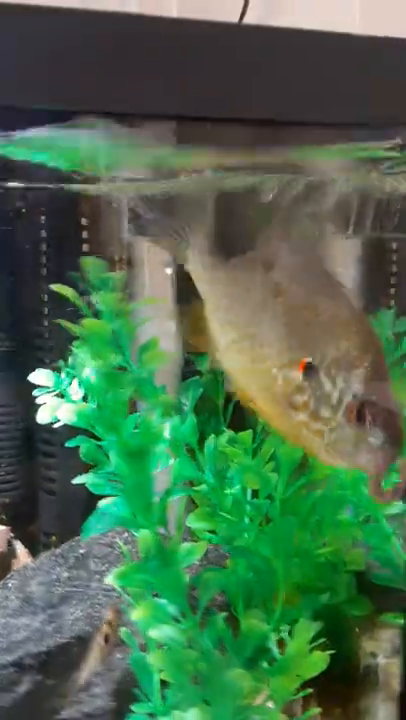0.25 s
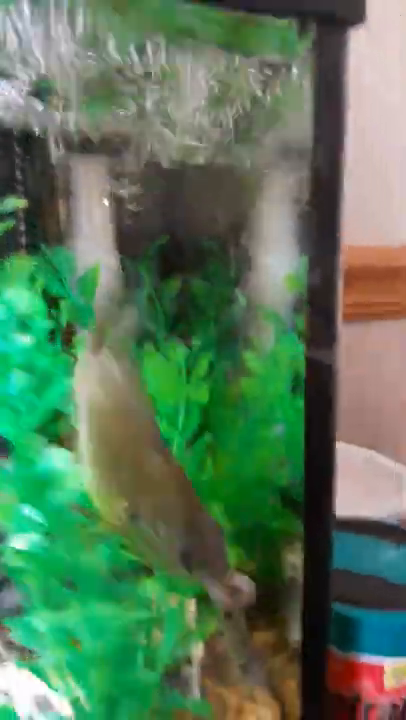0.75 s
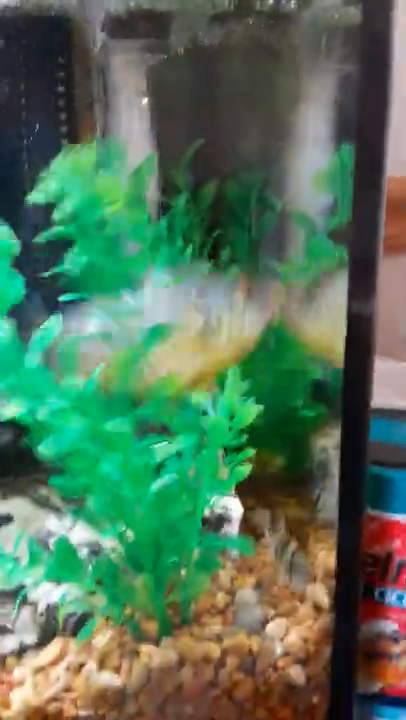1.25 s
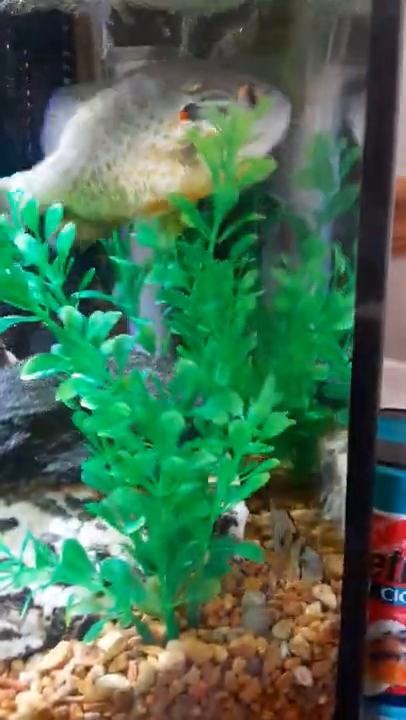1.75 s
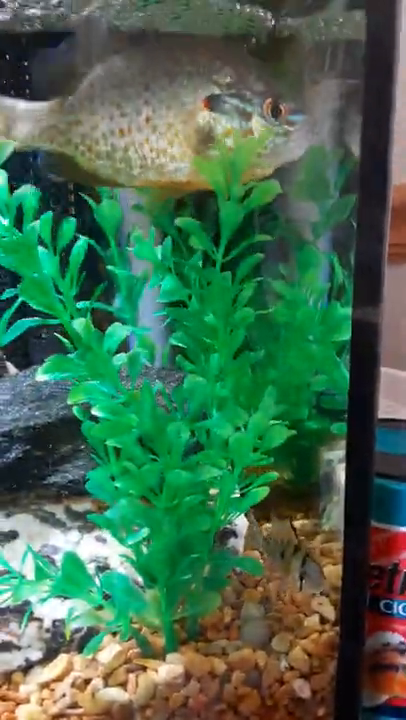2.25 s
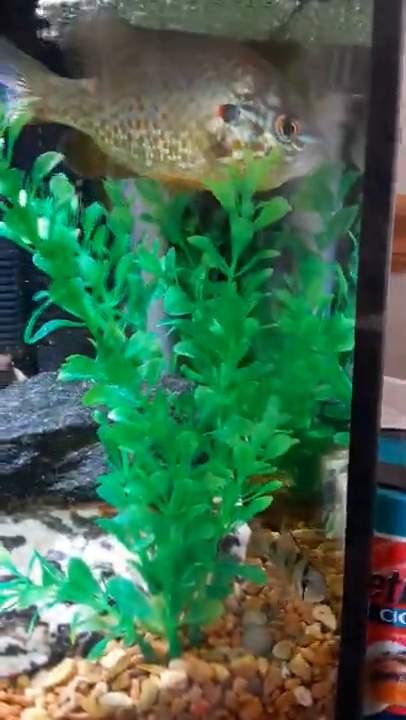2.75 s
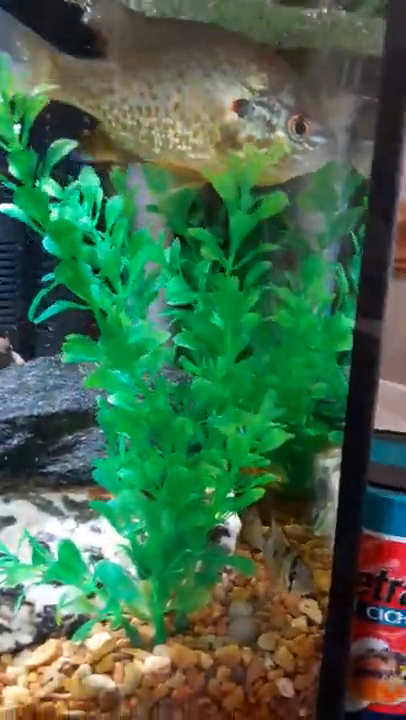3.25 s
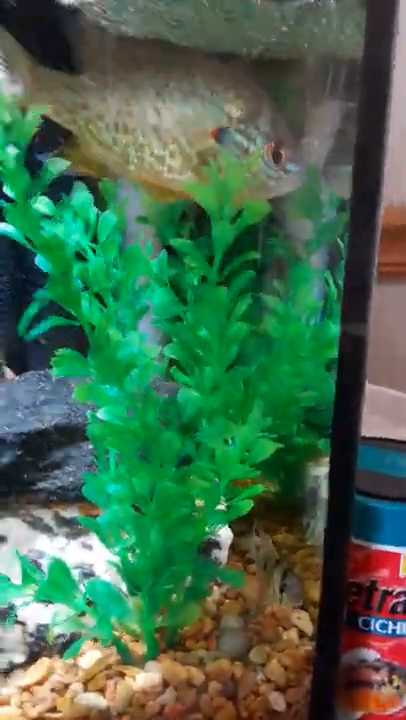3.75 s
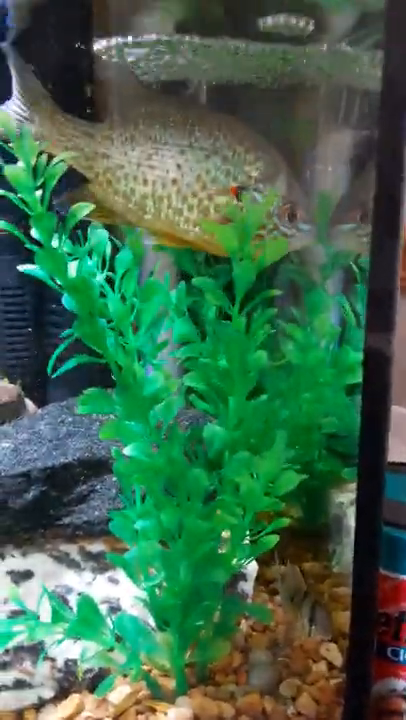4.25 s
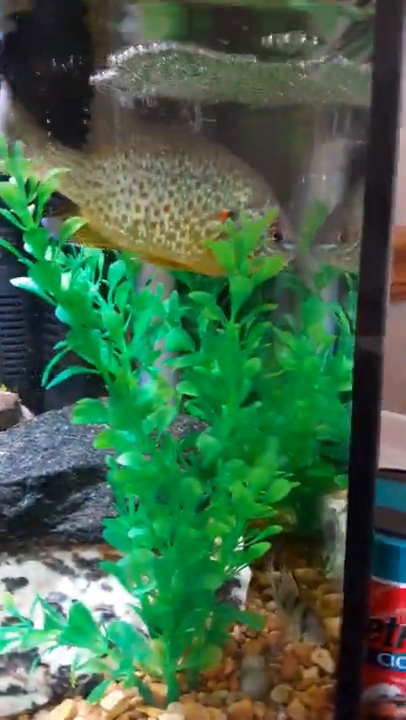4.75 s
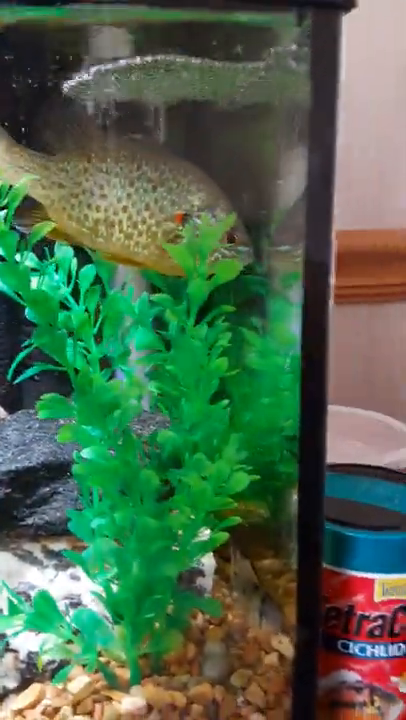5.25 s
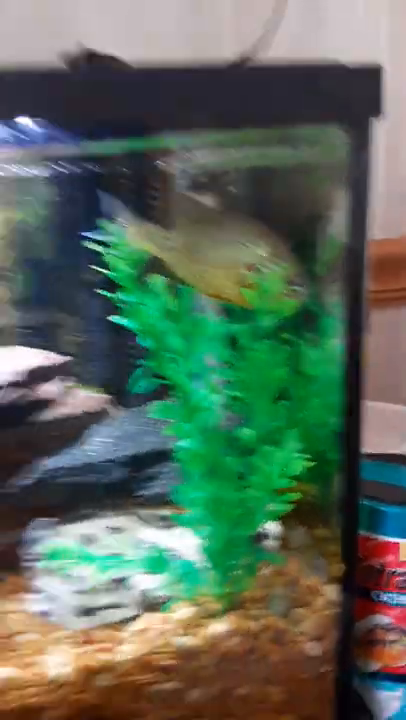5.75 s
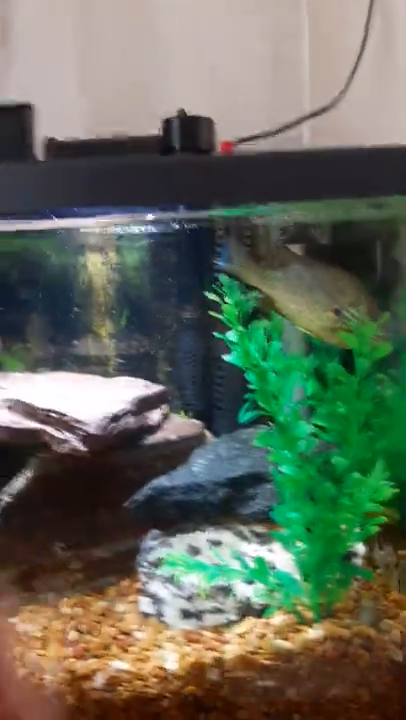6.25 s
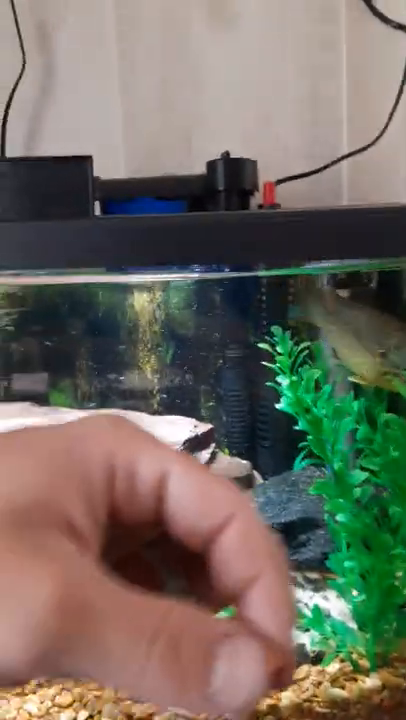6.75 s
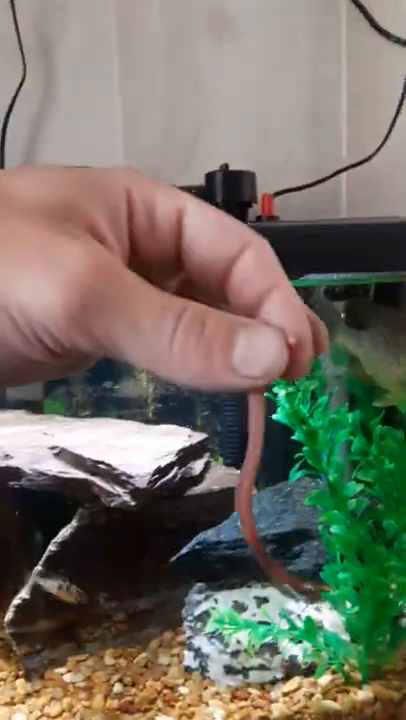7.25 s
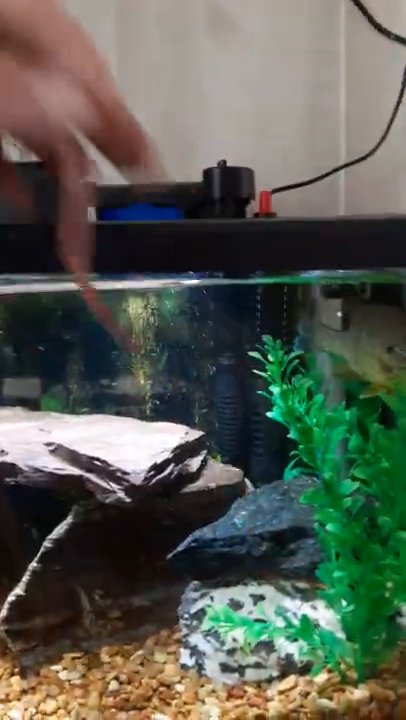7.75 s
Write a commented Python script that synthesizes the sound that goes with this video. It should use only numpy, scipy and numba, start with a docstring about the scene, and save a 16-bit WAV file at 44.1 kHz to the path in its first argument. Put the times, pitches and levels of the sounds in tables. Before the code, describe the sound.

A small aquarium filter trickles, drips and gurgles into its tank over a low pump hum, with a light knock at the end.

```python
"""A gulp and a patter of splashes: a small aquarium filter spills into its tank over the pump's mains hum.
Big low bubbles boom through the glass; drops and clouds of small bubbles ring under the hood.
Air pockets plop and a fish flicks its tail. The room is quiet, heard from a hand-held phone that moves
from the tank's corner to its front. Fingers rustle and tick by the right microphone,
and at the end a hand knocks the lid."""
import sys
import numpy as np
from scipy import signal
from scipy.fft import rfft, irfft
from scipy.io import wavfile
from scipy.ndimage import uniform_filter1d
from numba import njit

SR = 44100
rng = np.random.default_rng(int(sys.argv[2]) if len(sys.argv) > 2 else 0)


def output_pcm(signal):
    """Save a mono or channel-first signal as 16-bit PCM at the path in sys.argv[1].

    Samples are clipped to [-1, 1] before scaling.
    """
    pcm = np.clip(np.atleast_2d(signal).T, -1, 1) * 32767
    wavfile.write(sys.argv[1], SR, np.round(pcm).astype(np.int16))


N = 352800
T = np.arange(N) / SR
FREQS = np.arange(N // 2 + 1) * SR / N + 1e-6

# EQ curves for room tone, finger rustle, tail flicks and the low gurgle: f/Hz, gain/dB
ROOM_TONE_EQ = [(20, -17), (45, -6), (90, -2.5), (200, 0), (400, -6), (700, -10.5), (1400, -14.5),
                (3000, -17.5), (5000, -19), (7500, -18.5), (9300, -30), (11500, -18.5), (16000, -22.5)]
RUSTLE_EQ = [(2500, -20), (5000, 7.5), (7300, 5.5), (9200, -7.5), (11500, 6), (14000, 12.5), (16000, 4.5)]
FLICK_EQ = [(50, -15), (110, 6), (180, 1), (330, -9), (530, -13), (700, -22), (1500, -50)]
GURGLE_EQ = [(120, -5.5), (200, -2.5), (290, -2), (360, -1), (440, 1.5), (520, -3.5), (640, -7.5),
             (1000, 6.5), (1400, -12)]
# pump hum partials: multiple of the mains, level at the tank's corner/dB, level at its front/dB
HUM_PARTIALS = [(1, -58.5, -60), (2, -47, -47.5), (3, -64.5, -61), (5, -61.5, -63), (6, -68.5, -60.5),
                (7, -66, -79), (8, -73.5, -68.5), (9, -69, -99), (11, -73, -79), (13, -66.5, -75),
                (14, -100, -100)]
# fingers sliding on the phone: t/s, length/s, level/dB
FINGER_SLIDES = [(0.548, 0.11, -76), (3.043, 0.29, -70.5), (3.428, 0.17, -66), (3.8, 0.5, -69),
                 (4.602, 0.6, -72.5), (5.37, .24, -68), (6.08, 0.27, -68.5), (6.852, 0.26, -73),
                 (7.63, 0.4, -67)]
# sharp ticks on the phone's case: t/s, impulse level/dB
CASE_TICKS = [(5.6385, -23), (5.6576, -8.5), (5.750, -36), (5.759, -28)]
# light clicks around the tank: t/s, level/dB, f/Hz, bandwidth/Hz, ring/s
TANK_CLICKS = [(1.576, -43, 11700, 2600, 0.085), (2.037, -45, 13500, 2000, 0.055),
               (2.857, -46, 14200, 1500, .05), (3.037, -49, 3500, 3000, 0.0054)]
# a knock on the lid and its rattle: t/s, level/dB
LID_KNOCKS = [(7.9442, -18.5), (7.9492, -31), (7.971, -28)]
# resonances of the phone's case and of the plastic lid: f/Hz, bandwidth/Hz, gain/dB
CASE_MODES = [(7340, 1500, 1), (12800, 1000, 11), (14500, 1000, 16.5)]
PLASTIC_LID_MODES = [(770, 73, 12.5), (1050, 250, 2), (1520, 250, 13), (1840, 470, 1), (2600, 500, 1),
                     (2960, 110, 3), (3880, 710, -12), (5030, 440, -21), (7500, 1200, -37)]
# resonances of the tank's glass and lid, from the corner and the front: f/Hz, bandwidth/Hz, gain/dB
TANK_CORNER_MODES = [(194, 570, -6.5), (302, 45, -2), (344, 49, 4.5), (410, 36, -1.5), (444, 56, 2.5),
                     (759, 17, 3.5)]
TANK_FRONT_MODES = [(173, 23, -4.5), (315, 28, 0), (360, 30, 2), (481, 32, 2), (760, 28, -4.5)]
# resonances of the air gap under the hood, from the same two spots: f/Hz, bandwidth/Hz, gain/dB
HOOD_CORNER_MODES = [(950, 220, -8.5), (1180, 85, 2), (1576, 200, -0.5), (1910, 127, -5.5),
                     (2037, 104, -1.5), (2530, 370, -10), (3110, 230, -1), (3690, 280, 2.5),
                     (4480, 440, -9.5), (6100, 5400, -15)]
HOOD_FRONT_MODES = [(776, 26, 4.5), (1180, 67, 2), (1530, 100, 3.5), (1924, 150, 2), (2350, 130, -6.5),
                    (3100, 160, -2), (3430, 140, -1.5), (3760, 240, 3.5), (5500, 2100, -12)]
# flicks of the fish's tail: t/s, length/s, level/dB
TAIL_FLICKS = [(0.747, .015, -51), (1.163, .02, -43.5), (1.23, .025, -46)]
# air pockets and soft thumps in the tank: t/s, level/dB, f/Hz, ring/s
AIR_PLOPS = [(.519, -31.5, 402, 0.069), (0.7236, -17, 497, 0.021), (.734, -27.5, 465, 0.04),
             (.749, -29, 340, 0.032), (.772, -39, 370, 0.045), (.803, -35.5, 442, 0.065),
             (.868, -36, 330, 0.043), (1.172, -29, 228, .02), (1.238, -29, 186, .03),
             (1.651, -34, 453, 0.044), (1.783, -34.5, 307, 0.054), (1.815, -34, 392, 0.039),
             (1.855, -36, 430, .04), (2.48, -33.5, 312, 0.053), (2.495, -35, 403, 0.045),
             (2.899, -32, 138, 0.029), (2.982, -30, 334, .024), (3.317, -29, 406, 0.035),
             (3.335, -35, 406, 0.032), (3.378, -36, 352, 0.036), (3.434, -38, 420, 0.037),
             (3.523, -39, 402, 0.067), (3.652, -38, 420, 0.04), (3.686, -37, 387, 0.04),
             (4.035, -34.5, 314, 0.042), (5.108, -34.5, 358, .04), (5.618, -30.5, 380, 0.025),
             (5.725, -36, 357, 0.055), (6.145, -35, 210, 0.055), (6.721, -36, 285, .033)]
# spits of bursting foam: t/s, level/dB, f/Hz
FOAM_SPITS = [(.632, -55, 5300), (3.836, -53.5, 4360)]
# the outflow gulping air down into the tank: t/s, length/s, level/dB
OUTFLOW_GULPS = [(0.0, 0.084, -45.5), (0.374, 0.15, -49.5), (0.616, 0.044, -50), (0.73, 0.29, -53.5),
                 (1.462, 0.044, -50), (1.63, 0.034, -51), (1.784, 0.048, -49.5), (2.3, 0.084, -52),
                 (2.46, 0.11, -51), (2.857, 0.13, -51.5), (3.276, 0.2, -49.5), (3.619, 0.092, -48.5),
                 (4.023, 0.038, -51), (4.503, 0.036, -48), (4.888, 0.2, -57), (6.561, 0.21, -48.5),
                 (7.088, 0.24, -51), (7.397, 0.24, -47), (7.743, 0.031, -45.5)]
# bubble clouds driven under by splashes: t/s, length/s, cloud level/dB, spray level/dB
BUBBLE_CLOUDS = [(0.012, 0.038, -52, -50), (0.415, .04, -62, -61), (0.469, .025, -68, -50),
                 (0.52, 0.015, -51, -52.5), (0.615, 0.025, -57, -52), (.7, 0.069, -62, -66),
                 (0.897, 0.066, -53.5, -54.5), (1.057, 0.12, -56.5, -67), (1.393, .08, -58, -60),
                 (1.562, 0.014, -53, -57), (1.66, .015, -55, -53.5), (1.86, .045, -50, -57),
                 (2.346, .011, -59, -56), (2.508, .025, -56, -55), (2.983, .01, -52, -55),
                 (3.03, 0.052, -54, -54.5), (3.374, 0.089, -56.5, -64), (3.528, 0.12, -56, -62),
                 (3.663, 0.051, -51.5, -69), (3.79, .04, -52.5, -55), (3.94, 0.11, -56.5, -60),
                 (4.135, .012, -53, -56.5), (4.512, 0.016, -50.5, -49.5), (4.582, 0.1, -59.5, -64),
                 (4.874, 0.03, -54, -56.5), (5.012, 0.017, -53.5, -55), (5.127, 0.066, -49, -58),
                 (5.492, 0.032, -46, -50), (5.697, 0.025, -67, -56.5), (5.836, .03, -52.5, -61),
                 (5.882, .014, -66, -52.5), (5.993, 0.045, -56, -78), (6.063, .012, -59, -54.5),
                 (6.25, .019, -61, -60), (6.586, .008, -52, -52), (6.624, 0.027, -51, -50),
                 (6.712, 0.0089, -51, -51.5), (6.866, .02, -56, -52), (7.092, 0.052, -52.5, -56),
                 (7.16, .009, -53, -55), (7.215, .007, -53, -49), (7.246, 0.014, -51, -48),
                 (7.466, .005, -53, -53.5), (7.51, .006, -59, -53), (7.533, .006, -58, -51),
                 (7.565, .005, -51, -49), (7.615, 0.059, -58, -61), (7.83, .014, -53, -72),
                 (7.883, .01, -51, -55)]
# drops falling from the outflow: t/s, level/dB, bubble f/Hz
OUTFLOW_DROPS = [(0.021, -31, 2020), (0.037, -32, 1680), (0.085, -40.1, 2020), (0.1326, -42, 1790),
                 (0.1715, -37, 1720), (0.186, -34.5, 2000), (0.4025, -47, 1700), (0.4362, -45, 1260),
                 (0.454, -39.9, 2020), (0.469, -42, 1680), (0.4866, -37, 3920), (0.5217, -32.5, 2000),
                 (0.5722, -44, 1440), (0.5879, -45, 4010), (0.6084, -34.5, 2320), (0.621, -31, 3930),
                 (0.6377, -29.9, 1990), (0.724, -39, 1260), (0.7502, -45, 1700), (0.8035, -34.5, 1940),
                 (0.8887, -35, 3510), (0.9033, -36.7, 2080), (0.9236, -37.3, 1520), (0.9529, -37, 3350),
                 (1.0035, -36, 2060), (1.0697, -36.6, 1980), (1.0893, -38.4, 2100), (1.1194, -51, 1790),
                 (1.1447, -44.4, 1960), (1.1555, -35, 1300), (1.389, -36, 3540), (1.405, -39.1, 1840),
                 (1.4385, -43, 3030), (1.48, -38, 3170), (1.565, -35.7, 1260), (1.6525, -37, 1880),
                 (1.6691, -37, 1750), (1.7835, -37, 2160), (1.8511, -27.5, 1760), (1.8887, -38, 1880),
                 (2.0364, -42.6, 1810), (2.0849, -36.9, 1880), (2.2524, -38.7, 1790), (2.353, -37, 1940),
                 (2.4489, -35, 1710), (2.4856, -42, 1710), (2.4971, -39, 1690), (2.5179, -39.1, 1740),
                 (2.5471, -43, 2010), (2.5705, -43, 1260), (2.6198, -38, 1260), (2.7716, -38.3, 1840),
                 (2.7865, -40, 1710), (2.8021, -44, 1940), (2.9519, -40, 1580), (2.9858, -31, 1700),
                 (3.0257, -38, 2220), (3.0361, -28.5, 2200), (3.0538, -34, 1710), (3.0654, -35.4, 2380),
                 (3.1863, -43.8, 1790), (3.319, -34, 1270), (3.331, -39, 1320), (3.3815, -34, 2150),
                 (3.4355, -37, 1260), (3.4682, -43, 1910), (3.5321, -39, 1640), (3.5414, -38, 2130),
                 (3.5683, -42.5, 1820), (3.6188, -41, 3750), (3.6394, -37, 1740), (3.6705, -34, 1800),
                 (3.7, -35, 1260), (3.8, -40, 1980), (3.817, -37, 1880), (3.8386, -29.5, 3680),
                 (3.9376, -39, 1710), (3.955, -37, 1660), (4.0186, -37.7, 1840), (4.0376, -38, 1870),
                 (4.052, -42, 1640), (4.0828, -48, 1320), (4.103, -36, 1970), (4.1402, -32, 3150),
                 (4.2028, -38.5, 1910), (4.2202, -39, 2100), (4.3173, -50, 1730), (4.5143, -30.5, 2030),
                 (4.5314, -37.8, 1950), (4.6022, -39, 1920), (4.6305, -40, 1840), (4.6712, -45.0, 1730),
                 (4.8693, -34, 1850), (4.8849, -37.3, 3700), (4.903, -38, 1240), (4.967, -37, 2680),
                 (5.0206, -41, 1700), (5.069, -41, 1910), (5.1007, -38, 2130), (5.1346, -35.5, 1890),
                 (5.1521, -35.8, 2090), (5.17, -34.1, 1860), (5.185, -41, 1800), (5.2046, -33.5, 3700),
                 (5.464, -37, 1800), (5.5002, -33, 1880), (5.5182, -31, 2220), (5.6381, -37, 4060),
                 (5.702, -43, 1960), (5.713, -39, 3800), (5.8533, -38, 1980), (5.8695, -36.6, 1890),
                 (5.886, -31, 2450), (5.9037, -36.2, 3880), (5.9877, -33, 1720), (6.0138, -37, 1990),
                 (6.055, -42, 1410), (6.0687, -45, 1630), (6.0832, -47, 1720), (6.2353, -47, 1650),
                 (6.2531, -37.1, 1630), (6.3006, -44.1, 1770), (6.4554, -49, 1540), (6.5921, -43, 1410),
                 (6.6021, -43, 1600), (6.6138, -32, 1730), (6.6355, -26, 3000), (6.652, -27, 3920),
                 (6.6898, -35.5, 1450), (6.72, -39.2, 1590), (6.7476, -41.0, 1570), (6.802, -42, 1890),
                 (6.818, -35, 2450), (6.8354, -41, 1860), (6.868, -35, 3730), (6.885, -32.6, 1900),
                 (6.9522, -30.5, 1850), (6.986, -42, 1600), (7.04, -40, 1590), (7.0864, -33.5, 1620),
                 (7.1185, -34, 1690), (7.17, -35, 1560), (7.219, -36, 4120), (7.2518, -32, 1580),
                 (7.2692, -41, 1600), (7.3047, -46, 1660), (7.335, -42, 1750), (7.386, -40, 1610),
                 (7.4209, -36, 1450), (7.4384, -36, 1950), (7.469, -29.5, 1560), (7.4998, -31.5, 1880),
                 (7.5405, -39, 1520), (7.5513, -37.8, 1670), (7.5695, -29, 3670), (7.6105, -32.5, 1510),
                 (7.6412, -36, 1420), (7.6533, -39, 1540), (7.7085, -44, 1450), (7.7527, -41, 1590),
                 (7.7716, -38, 2370), (7.8013, -37, 1580), (7.852, -34.5, 1470), (7.8825, -34, 1600)]

SPLASH_ATTACK_S, SPRAY_FALL_DB_PER_S = .0012, 467


def undb(db):
    """Decibels to gain."""
    return 10 ** (np.asarray(db) / 20)


def unit(x):
    """Scale to rms 1."""
    return x / np.sqrt(np.mean(x ** 2))


def pan(db):
    """Stereo gains that favour the left by db."""
    return undb(np.array([[db], [-db]]) / 2)


def wander(rate_hz):
    """Smooth random modulation, spread near 1."""
    step = int(SR / rate_hz)
    return 1.3 * uniform_filter1d(np.repeat(rng.standard_normal(N // step + 1), step), step)[:N]


def swells(starts, lengths, dbs, attack_s, fall_db_per_s, rest_db=-np.inf):
    """Envelope that rises, holds and dies away for each event, over a resting level."""
    t = T[::40]
    age = t - starts[:, None]
    fade_db = fall_db_per_s * np.maximum(age - lengths[:, None], 0)
    each = np.clip(age / attack_s, 0, 1) * undb(dbs[:, None] - fade_db)
    together = np.sqrt(np.sum(each ** 2, axis=0))
    return np.hypot(np.interp(T, t, together), undb(rest_db))


def eq(x, curve):
    """Shape a sound by (Hz, dB) points."""
    hz, db = np.transpose(curve)
    return irfft(rfft(x) * undb(np.interp(np.log(FREQS), np.log(hz), db)), N)


def resonate(x, modes, leak=0):
    """Ring (Hz, bandwidth, dB) resonances; a share of the sound leaks straight past them."""
    response = sum(undb(db) / (1 + 1j * (FREQS / hz - hz / FREQS) * hz / width)
                   for hz, width, db in modes)
    return irfft(rfft(x) * (leak + response), N)


def noise_band(hz, width_hz):
    """Noise through one resonance, at rms 1."""
    return unit(resonate(rng.standard_normal(N), [(hz, width_hz, 0)]))


def diffuse(split_hz):
    """Noise from all sides: alike at both microphones in the bass, unrelated in the treble."""
    mid, side = rfft(rng.standard_normal((2, N)))
    alike = 1 / (1 + (FREQS / split_hz) ** 2)
    stereo = np.sqrt(1 + alike) * mid + np.sqrt(1 - alike) * side * np.array([[1], [-1]])
    return irfft(stereo, N) / np.sqrt(2)


def room(x, wet_db, t60, patterns=1):
    """Direct sound, left first, plus a short wall tail; several tails crossfade as the phone sways."""
    size, right_lag_s = SR // 2, .00045
    tails = np.split(diffuse(split_hz=750)[:, :patterns * size], patterns, axis=1)
    shares = np.array([undb(7 * wander(2.5)) for _ in tails])
    wet = 0
    for tail, share in zip(tails, shares / np.linalg.norm(shares, axis=0)):
        tail = tail * undb(-60 * T[:size] / t60)
        tail = tail / np.sqrt(np.sum(tail ** 2) / 2)
        wet = wet + share * signal.fftconvolve(x[None], tail)[:, :N]
    direct = np.array([x, np.interp(T - right_lag_s, T, x)])
    return (direct + undb(wet_db) * wet) / np.hypot(1, undb(wet_db))


def phone_position():
    """How far the phone has moved from the tank's corner (0) to its front (1)."""
    return np.interp(T, [5.5, 6.5], [0, 1])


def perspective(corner, front):
    """Equal-power crossfade from the corner sound to the front sound as the phone moves."""
    return corner * np.sqrt(1 - phone_position()) + front * np.sqrt(phone_position())


@njit
def bubbles(times, gains, hz, t60, glide):
    """Each bubble is a dying sine whose pitch climbs as it nears the surface."""
    out = np.zeros(N)
    for k in range(len(times)):
        start, length = max(int(times[k] * SR), 0), t60[k] * SR
        for i in range(min(int(length), N - start)):
            age = i / length
            cycles = hz[k] * i / SR * (1 + glide * age / 2)
            envelope = np.exp(-6.9 * age) * (1 - np.exp(-2 * cycles))
            out[start + i] += gains[k] * envelope * np.sin(2 * np.pi * cycles)
    return out


def swarm(count, low_hz, high_hz, cycles, scatter_db):
    """A bed of bubbles of random size at random moments, mostly faint, a few strong."""
    when, size, pitch, life = rng.random((count, 4)).T
    hz = low_hz * (high_hz / low_hz) ** pitch
    gains = undb(-scatter_db * np.log(.02 + size))
    return unit(bubbles(when * N / SR, gains, hz, t60=cycles * (.5 + life) / hz, glide=.13))


def room_tone():
    """Quiet room air and the microphones' own hiss."""
    return unit(eq(diffuse(split_hz=1100), ROOM_TONE_EQ)) * undb(-55.5)


def pump():
    """The housing's wavering drone, plus the motor's mains harmonics."""
    mains_hz, housing_hz = 60, 273.7
    housing_gain = np.sqrt(2) * undb(-61.5 + 3 * wander(10))
    out = housing_gain * np.sin(2 * np.pi * housing_hz * T + .5 * wander(12))
    lag_rad = np.array([[.46], [0]])  # the standing waves reach the left microphone a little later
    for harmonic, corner_db, front_db in HUM_PARTIALS:
        hz = harmonic * mains_hz
        left_db = np.interp(hz, [120, 300], [.5, 8])
        # the phone drifts through standing waves, so short wavelengths waver most
        waver_db = hz / 550 * (wander(9) + wander(35))
        gain = np.sqrt(2) * undb(corner_db + (front_db - corner_db) * phone_position() + waver_db)
        out = out + pan(left_db) * gain * np.sin(2 * np.pi * (hz * T + rng.random()) - lag_rad)
    return out


def fingers():
    """Handling noise, hard right: skin rustles, squeaks and ticks on the phone's case."""
    grip = undb(1.2 * wander(25))
    sliding = swells(*np.transpose(FINGER_SLIDES), attack_s=.18, fall_db_per_s=43, rest_db=-78)
    rustle = unit(eq(rng.standard_normal(N), RUSTLE_EQ)) * sliding * grip
    squeak_fade = np.interp(T, [5.41, 5.46, 5.63, 5.69], [0, 1, 1, 0])
    squeak = noise_band(7050, width_hz=450) * undb(-58) * squeak_fade
    when, db = np.transpose(CASE_TICKS)
    impulses = np.zeros(N)
    impulses[(when * SR).astype(int)] = undb(db)
    ticks = resonate(impulses, CASE_MODES)
    return pan(-27.5) * rustle + (ticks + squeak) * undb([[-30], [0]])


def clicks():
    """Light clicks around the tank: each a dying noise burst through one bright resonance."""
    out = 0
    for start, db, hz, width, ring_s in TANK_CLICKS:
        gate = (T >= start) & (T < start + 2 * ring_s)
        decay = undb(-60 * np.clip((T - start) / ring_s, 0, 2))
        click = resonate(rng.standard_normal(N) * gate * decay, [(hz, width, 0)])
        out = out + undb(db) * click / np.abs(click).max()
    return room(out, wet_db=0, t60=.11)


def lid_knocks():
    """Each knock is one sharp push that rings the hollow lid."""
    out = 0
    for start, db in LID_KNOCKS:
        clack = resonate(signal.unit_impulse(N, int(start * SR)), PLASTIC_LID_MODES)
        out = out + undb(db) * clack / np.abs(clack).max()
    return room(out, wet_db=-2, t60=.12)


def fish():
    """The fish flicks its tail and shoves water against the glass: short, dark puffs of noise."""
    flicks = swells(*np.transpose(TAIL_FLICKS), attack_s=.006, fall_db_per_s=230)
    shove = unit(eq(rng.standard_normal(N), FLICK_EQ)) * flicks
    return pan(2) * room(shove, wet_db=-9, t60=.12)


def plops():
    """Large air pockets and shoves of water ring as single low, round bubbles."""
    when, db, hz, ring_s = np.transpose(AIR_PLOPS)
    return pan(2) * room(bubbles(when, undb(db), hz, ring_s, glide=.065), wet_db=-9.5, t60=.21)


def spits():
    """A film of water bursts into a brief, pitched spit of tiny bubbles."""
    length_s, width_hz = np.array([.015]), 1600
    out = 0
    for start, db, hz in FOAM_SPITS:
        fizz = unit(resonate(noise_band(hz, width_hz), [(hz, width_hz, 0)]))
        burst = swells(np.array([start]), length_s, np.array([db]), SPLASH_ATTACK_S, SPRAY_FALL_DB_PER_S)
        out = out + fizz * burst
    return room(out, wet_db=-2, t60=.1)


def gurgle():
    """The low end: big bubbles under the outflow boom through the glass, swelling with each gulp."""
    even_flow_db = -56 + .5 * wander(16)
    flow = swells(*np.transpose(OUTFLOW_GULPS), attack_s=.0038, fall_db_per_s=172, rest_db=even_flow_db)
    deep = eq(swarm(count=3600, low_hz=149.8, high_hz=1130, cycles=10.4, scatter_db=2), GURGLE_EQ)
    corner = unit(resonate(deep, TANK_CORNER_MODES, leak=.61))
    front = unit(resonate(deep, TANK_FRONT_MODES, leak=.25)) * undb(-4)
    return pan(4.35) * room(perspective(corner, front) * flow, wet_db=-2, t60=.16, patterns=6)


def bubble_clouds():
    """Splashes drive bubbles of four sizes under, in quick spurts over a thin steady trickle."""
    when, length, cloud_db, spray_db = np.transpose(BUBBLE_CLOUDS)
    drift_db = 2 * wander(16)
    cloud = swells(when, length, cloud_db, SPLASH_ATTACK_S, fall_db_per_s=340, rest_db=-62.5 + drift_db)
    late = when + .00054  # the finest bubbles break loose just after the drop lands
    mist = swells(late, length, spray_db, SPLASH_ATTACK_S, SPRAY_FALL_DB_PER_S, rest_db=-65.5 + drift_db)
    medium = swarm(count=2400, low_hz=537, high_hz=1356, cycles=6.7, scatter_db=3.8)
    small = swarm(count=3000, low_hz=1350, high_hz=2740, cycles=11, scatter_db=3)
    spray = swarm(count=4500, low_hz=2400, high_hz=4500, cycles=10, scatter_db=3)
    fizz = swarm(count=6000, low_hz=4700, high_hz=8000, cycles=7, scatter_db=2.5)
    spurts = undb(.5 * wander(89.74))
    return ((small + undb(-1.1) * medium) * cloud + (spray + undb(-1.5) * fizz) * mist) * spurts


def splats(when, db):
    """The surface tears where a big drop lands: a wet smack of broad noise."""
    smack = swells(when, np.zeros(len(when)), db - 19.5, attack_s=.0005, fall_db_per_s=1504)
    return noise_band(2450, width_hz=1300) * smack


def drops(when, db, hz):
    """A drop slaps the surface, its bubble rings for milliseconds, and seven finer bubbles follow."""
    count = len(when)
    slap = bubbles(when, undb(db + 2), hz=np.full(count, 2600.), t60=np.full(count, .0009), glide=0.)
    ring = bubbles(when, undb(db), hz, t60=15 / hz, glide=.07)
    delay, pitch, size = rng.random((count, 7, 3)).transpose(2, 0, 1)
    fine_when = (when[:, None] + .002 + .036 * delay ** 2).ravel()
    fine_db = (db[:, None] - 18 - 5 * pitch - 6 * delay - 7 * (size - .5)).ravel()
    fine_hz = 2100 * 2 ** pitch.ravel()
    spatter = bubbles(fine_when, undb(fine_db), fine_hz, t60=18 / fine_hz, glide=.1)
    return slap + ring + spatter


def drips(count):
    """Faint drops fall at random among the louder ones."""
    size, pitch = rng.standard_normal((count, 2)).T
    return drops(rng.random(count) * N / SR, db=-62 + 7 * size, hz=1920 * 2 ** (.26 * pitch))


def hood(x):
    """The air gap under the hood rings; its resonances slide as the water rocks."""
    sway_depth, sway_hz = .025, 5
    # warping time, ringing, then warping back bends only the resonances
    rocked = T + sway_depth / (2 * sway_hz) * wander(sway_hz)
    warped = np.interp(T, rocked, x)
    ringing = perspective(resonate(warped, HOOD_CORNER_MODES), resonate(warped, HOOD_FRONT_MODES))
    return np.interp(rocked, T, ringing)


def splashes():
    """The lead sound: crisp drops and bubble clouds from the outflow, ringing under the hood."""
    clouds = bubble_clouds()
    when, db, hz = np.transpose(OUTFLOW_DROPS)
    falling = splats(when, db) + drops(when, db, hz) + drips(count=40)
    leaked = .1 * clouds + .37 * falling  # passes the hood without ringing
    return pan(2.6) * room(hood(clouds + falling) + leaked, wet_db=-2, t60=.1, patterns=6)


def scene():
    """The mix: pump, water and fish, then clicks, the lid, handling noise and room tone."""
    aquarium = pump() + gurgle() + splashes() + spits() + plops() + fish()
    return aquarium + clicks() + lid_knocks() + fingers() + room_tone()


def record(dry):
    """The phone rolls off the deepest bass and cuts the top."""
    low_cut = signal.butter(4, 42, "high", fs=SR, output="sos")
    high_cut = signal.ellip(8, .1, 50, 15800, fs=SR, output="sos")
    return signal.sosfiltfilt(high_cut, signal.sosfilt(low_cut, dry), padtype="even")


dry = scene()
out = record(dry)
output_pcm(out)
```